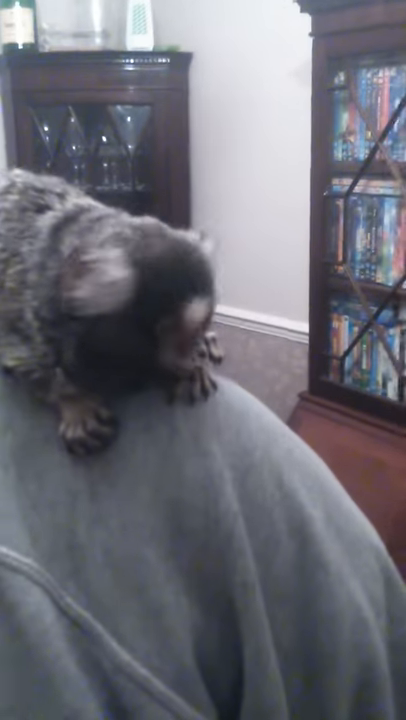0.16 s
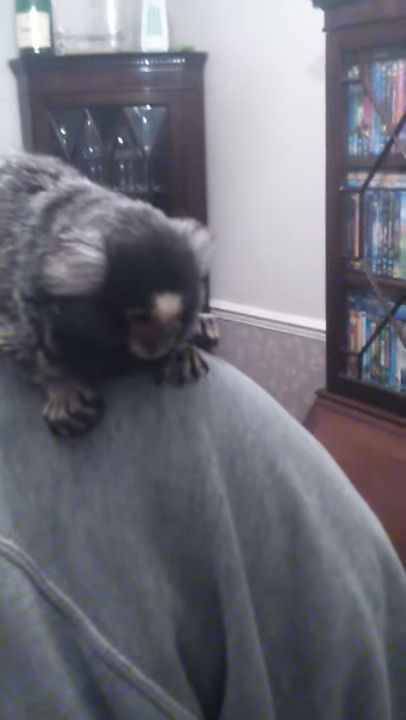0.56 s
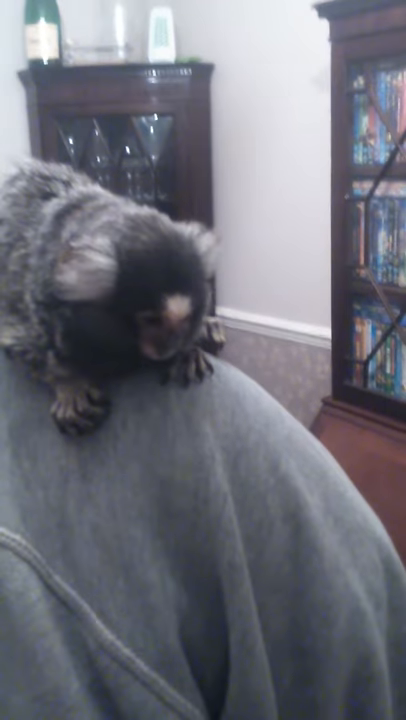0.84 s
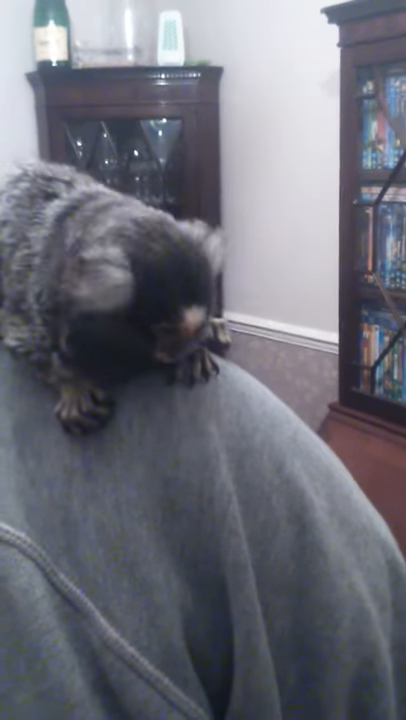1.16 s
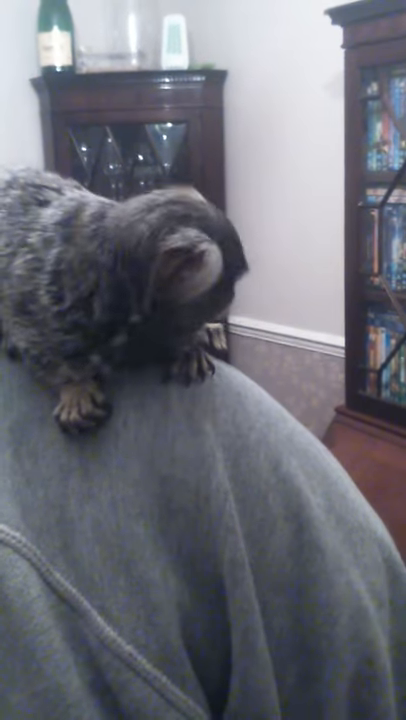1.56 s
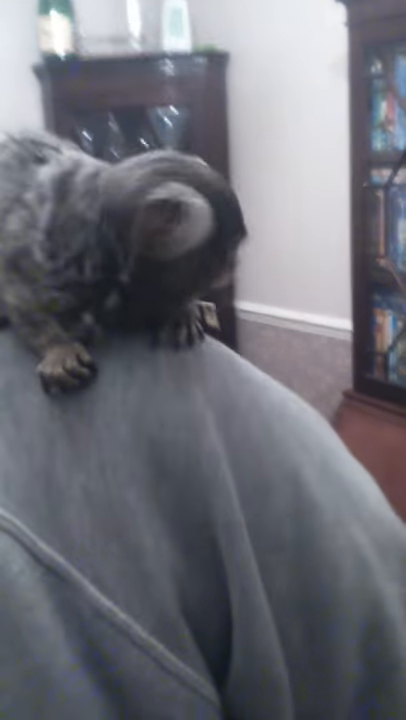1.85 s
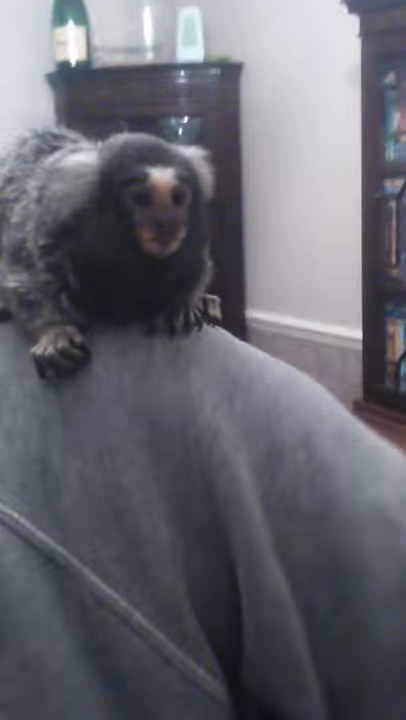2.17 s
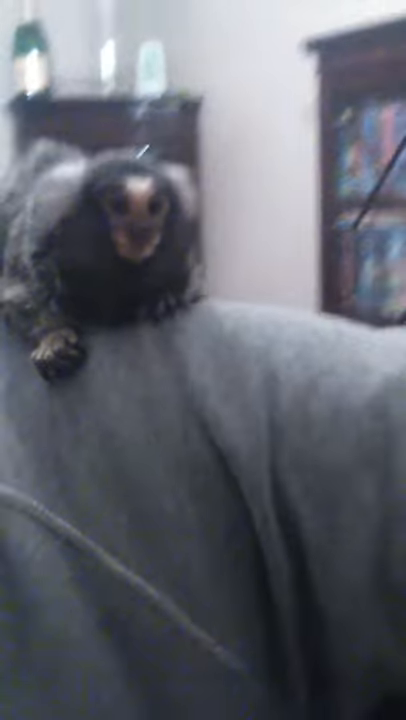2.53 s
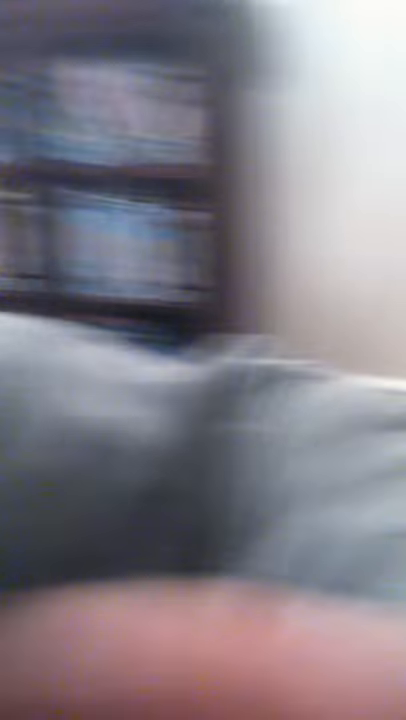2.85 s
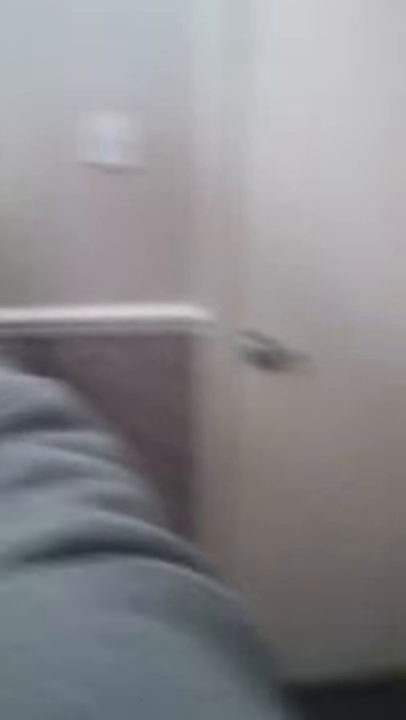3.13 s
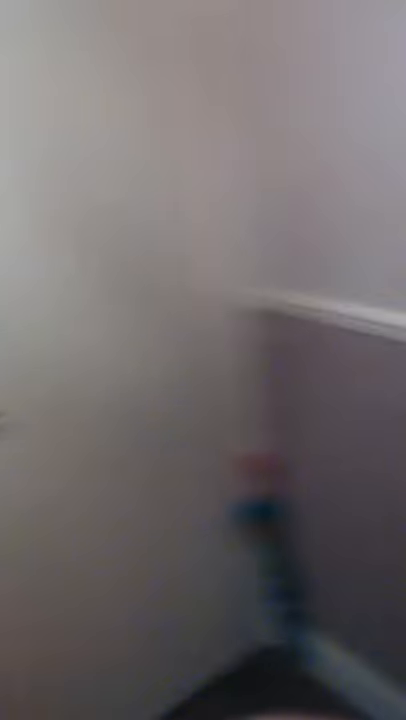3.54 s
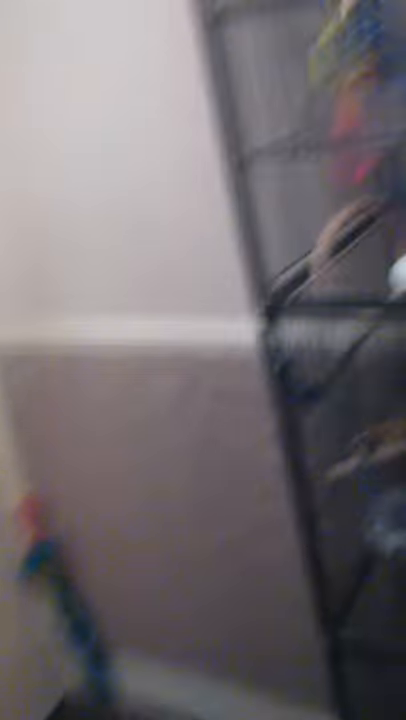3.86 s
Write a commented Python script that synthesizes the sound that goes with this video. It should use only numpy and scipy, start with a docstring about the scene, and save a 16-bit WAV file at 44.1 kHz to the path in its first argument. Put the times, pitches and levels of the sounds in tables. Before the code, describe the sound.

A small monkey chitters faintly in a quiet furnished room with low rumble, hiss and slight hum. After 1.2 s of room tone come thin gliding squeaks and dry raspy chirps, strongest around 1.2-1.5 s, then sparse until 2.6 s. Soft phone taps and ticks follow at 2.7-3.3 s. At 3.3-3.4 s a very loud, distorted, fluttering thump and scrape hits the microphone, then faint cloth rustle and a tiny tap at 3.9 s.

```python
"""A small monkey on a person's shoulder chitters in a quiet room: gliding sines squeak and random throat pulses
rasp through one strong mouth resonance, with a short room answer. The hand holding the phone then shifts: decaying
sines tap the case, single pushes tick, a low flap and grainy noise scrape loudly over the microphone, and shaped
noise rustles like soft cloth. Noise and wavering sines give room rumble, microphone hiss and mains hum under all."""
import sys
import numpy as np
from scipy import signal
from scipy.fft import rfft, irfft, next_fast_len
from scipy.io import wavfile
from scipy.ndimage import uniform_filter1d, map_coordinates

SR = 44100
rng = np.random.default_rng(int(sys.argv[2]) if len(sys.argv) > 2 else 0)


def magnitude_from_level(level_db):
    """Linear magnitude for a level in decibels (20 dB per decade)."""
    exponent = np.asarray(level_db, float) / 20
    return 10 ** exponent


def generate_wav(signal):
    """Clip the signal to [-1, 1] and save it as 16-bit WAV at the path in sys.argv[1]."""
    frames = np.transpose(np.atleast_2d(signal))
    scaled = np.clip(frames, -1, 1) * 32767
    pcm = np.round(scaled).astype(np.int16)
    wavfile.write(sys.argv[1], SR, pcm)


N = 176400
T = np.arange(N) / SR


def unit(x):
    """Normalisation: divides a signal by its root mean square."""
    return x / np.sqrt(np.mean(x ** 2) + 1e-20)


def curves(rows):
    """Linear interpolation: each column after the time as one value per sample, then an on/off gate."""
    times, *columns = np.transpose(rows)
    gate = (T >= times[0]) & (T <= times[-1])
    return [np.interp(T, times, column) for column in columns] + [gate]


def wobble(rate):
    """Slow random modulation: a smooth spline through normal random knots, rate of them a second."""
    knots = rng.standard_normal(int(N * rate / SR) + 4)
    return map_coordinates(knots, [T * rate])


def filtered(x, response):
    """Linear filtering: multiplies the spectrum by a response given as a function of frequency in Hz."""
    size = next_fast_len(N + SR // 2)
    spectrum = rfft(x, size) * response(np.fft.rfftfreq(size, 1 / SR))
    return irfft(spectrum, size)[:N]


def noise(points):
    """Spectral shaping: white noise coloured along a log-frequency curve, then brought to rms 1."""
    f, db = np.transpose(points)

    def colour(hz):
        return magnitude_from_level(np.interp(np.log(hz + 1), np.log(f + 1), db))
    return unit(filtered(rng.standard_normal(N), colour))


def peak(centre_hz, width_hz):
    """Second-order resonance: a response of unit gain at its centre, falling off to both sides."""
    return lambda f: 1j * f * width_hz / (centre_hz ** 2 - f * f + 1j * f * width_hz)


def voice(hz, gain, overtone):
    """Frequency and amplitude modulation: a wavering, shimmering sine with its octave at a given ratio."""
    waver, shimmer_db = 0.025, 4  # fraction of the pitch; dB
    phase = 2 * np.pi * np.cumsum(hz * (1 + waver * wobble(500))) / SR
    tone = np.sin(phase) + overtone * np.sin(2 * phase)
    return gain * magnitude_from_level(shimmer_db * wobble(300)) * tone * np.sqrt(2)


def mains_hum():
    """Additive synthesis: mains harmonics as sines with slowly drifting phase and level."""
    # mains harmonics: (frequency [Hz], mid rms level [dB])
    harmonics = [(200, -75.5), (300, -75.5)]
    total = np.zeros(N)
    for hz, db in harmonics:
        level = magnitude_from_level(db + 1.5 * wobble(6.14))
        total += level * np.sqrt(2) * np.sin(2 * np.pi * hz * T + 0.5 * wobble(2.2))
    return total


def room():
    """Stationary noise: hiss and rumble share one sloping spectrum, of which only the bass sways in level."""
    # spectrum of the noise floor: (frequency [Hz], relative level per Hz [dB])
    floor_tone = [(30, -5), (55, 5), (170, -12.5), (400, -18.5), (1150, -24.5), (4000, -29), (15600, -32)]
    floor_db = -57.5  # rms before the sway
    sway_db, bass_top_hz = 1.5, 130
    after_db, moved_s = -4.5, 3.4  # the bass drops once the phone points elsewhere
    floor = magnitude_from_level(floor_db) * noise(floor_tone)
    bass = filtered(floor, lambda f: 1 / (1 + (f / bass_top_hz) ** 4))
    sway = magnitude_from_level(sway_db * wobble(8.85) + after_db * (T > moved_s))
    return floor + (sway - 1) * bass + mains_hum()


def cloth():
    """Friction noise: fabric rustles as high-pitched noise under a changing level."""
    # level of the rustle: (time [s], level [dB])
    rustle_level = [(3.36, -81), (3.4, -35), (3.45, -60.5), (3.6, -71), (3.65, -61), (3.7, -66.5),
                    (3.8, -62), (3.87, -61.5), (3.91, -69.5)]
    # spectrum of the rustle: (frequency [Hz], relative level per Hz [dB])
    rustle_tone = [(2500, -24.5), (4000, -15.5), (8000, -11), (15500, -23)]
    db, gate = curves(rustle_level)
    return magnitude_from_level(db + 1.5 * wobble(60)) * gate * noise(rustle_tone)


def rubbing():
    """Friction noise: fast random level swings make the dragging hand's noise crackle."""
    # level of the rubbing: (time [s], level [dB])
    rub_level = [(3.2, -62), (3.285, -42), (3.3, -19), (3.302, -60), (3.326, -55), (3.33, -28),
                 (3.333, -55), (3.339, -26), (3.349, -29), (3.356, -52), (3.369, -23), (3.385, -16),
                 (3.4, -17), (3.408, -28), (3.427, -39), (3.432, -54), (3.46, -70)]
    # spectrum of the rubbing: (frequency [Hz], relative level per Hz [dB])
    rub_tone = [(120, -6.5), (300, -1.5), (600, -16.5), (3000, -19.5), (15500, -51)]
    grain_db = 3.3
    rub = unit(noise(rub_tone) * magnitude_from_level(grain_db * wobble(900)))
    db, gate = curves(rub_level)
    return magnitude_from_level(db) * gate * rub


def scrape():
    """Saturation: a low skin flap of changing rate and the rubbing press the membrane until it bottoms out."""
    # skin flapping over the port: (time [s], mid rate [Hz], level of the fundamental before the limit [dB])
    flapping = [(3.3075, 55.5, -19), (3.311, 52, -11), (3.319, 40, -7), (3.326, 55.08, -9),
                (3.362, 56.1, -11.5), (3.371, 112, -13), (3.398, 145.2, -16), (3.405, 121, -49),
                (3.47, 80, -57.5)]
    rate_wobble, overtone, skew_rad = 0.042, 0.21, 3.8  # the third harmonic squares the swing
    whine_hz, whine_db = 6000, -48  # dB relative to the flap
    membrane_top = 0.48  # largest swing, full scale = 1
    hz, db, gate = curves(flapping)
    phase = 2 * np.pi * np.cumsum(hz * gate * (1 + rate_wobble * wobble(80))) / SR
    swing = np.sin(phase) + overtone * np.sin(3 * phase + skew_rad)
    both = magnitude_from_level(db) * gate * np.sqrt(2) * swing + rubbing()
    limited = both / (1 + np.abs(both / membrane_top) ** 4) ** 0.25
    # a thin whine with its octave swells twice in each flap cycle
    whine = magnitude_from_level(whine_db + db) * gate * np.cos(phase) ** 2 * voice(whine_hz, 1, 0.74)
    return limited + whine


def taps():
    """Damped vibration: each soft tap on the case is a decaying sine whose pitch sinks as it dies."""
    # taps: (time [s], level at the onset [dB], starting pitch [Hz], time to fall 60 dB [s])
    case_taps = [(1.422, -34.5, 366, 0.0097), (2.703, -44, 75.5, 0.39), (2.9228, -29.5, 260, 0.02),
                 (3.031, -38.5, 90, 0.045), (3.9, -48, 501, 0.0166)]
    rise_s = 0.00023
    out = np.zeros(N)
    for start, db, hz, t60 in case_taps:
        t = np.clip(T - start, 0, 1)
        phase = 2 * np.pi * hz * t60 / 4 * np.log1p(4 * t / t60)
        out -= magnitude_from_level(db - 60 * t / t60) * np.sin(phase) * (1 - np.exp(-t / rise_s))
    return out


def ticks():
    """Impulse: each sharp finger tick is a single one-sided push, shorter and so brighter at a higher corner."""
    # ticks: (time [s], peak level [dB], frequency above which it is dull [Hz])
    finger_ticks = [(1.4209, -43, 700), (2.917, -44, 600), (2.970, -42, 1800), (2.993, -49.5, 900),
                    (3.012, -45, 1800), (3.0292, -39, 796), (3.268, -37, 6000)]
    out = np.zeros(N)
    for start, db, dull_hz in finger_ticks:
        u = np.clip(T - start, 0, 0.1) * 2 * np.pi * dull_hz
        out += magnitude_from_level(db) * (u * np.exp(1 - u)) ** 2
    return out


def snaps():
    """Exponential relaxation: skin snaps on and off the port, so the pressure jumps and sinks back."""
    # snaps: (time [s], signed pressure step before the rise softens it [full scale = 1], decay constant [s])
    skin_snaps = [(3.3063, -0.73, 0.0017), (3.316, 0.37, .001), (3.3197, -0.24, .0003),
                  (3.3231, .08, .0004), (3.3967, -2, 0.000074)]
    rise_s = 0.00012
    out = np.zeros(N)
    for start, step, life in skin_snaps:
        t = np.clip(T - start, 0, 1)
        out += step * np.exp(-t / life) * (1 - np.exp(-t / rise_s))
    return out


def squeaks():
    """Frequency glide: one long whistle with an octave, and short pure squeaks, before the mouth shapes them."""
    # the long whistle: (time [s], mid pitch [Hz], mid level before the mouth [dB])
    whistle_glide = [(1.228, 3500, -70), (1.233, 3250, -63), (1.242, 2685, -60), (1.245, 3000, -78),
                     (1.251, 3356, -65), (1.271, 2550, -60), (1.29, 3150, -64), (1.297, 2500, -59),
                     (1.304, 1900, -63), (1.308, 1800, -77.5)]
    # short squeaks: (time [s], length [s], mid level before the mouth [dB], start pitch [Hz], end pitch [Hz])
    short_squeaks = [(1.219, 0.011, -49.5, 5020, 3776), (1.295, 0.0084, -57, 5100, 4213),
                     (1.298, 0.0167, -48, 4140, 4054), (1.322, 0.018, -55.5, 4240, 4060),
                     (1.454, .022, -72, 7030, 6600), (1.4732, 0.021, -61.5, 5520, 5100),
                     (1.494, 0.0087, -53.5, 5100, 4350), (1.632, 0.0096, -61, 5034, 4500),
                     (2.036, 0.007, -60.5, 2400, 3070), (2.043, 0.0046, -62, 4080, 4600),
                     (2.093, 0.0069, -61, 4900, 4160), (2.111, 0.012, -58.5, 4136, 4238),
                     (2.2152, 0.0051, -56, 3985, 4820), (2.407, 0.0087, -56, 4809, 4300)]
    octave_db = -12
    hz, db, gate = curves(whistle_glide)
    tones = voice(hz, magnitude_from_level(db) * gate, magnitude_from_level(octave_db))
    for start, length, db, start_hz, end_hz in short_squeaks:
        u = np.clip((T - start) / length, 0, 1)  # progress through the squeak
        swell = np.abs(np.sin(np.pi * u ** 0.68)) ** 0.37 * (u < 1)
        tones = tones + voice(start_hz + (end_hz - start_hz) * u, magnitude_from_level(db) * swell, 0)
    return tones


def pulses():
    """Random excitation: irregular clumped throat pulses, evened out by their running power."""
    pulses_per_s, spread_db = 5000, 4
    hits = rng.random(N) < pulses_per_s / SR
    p = hits * rng.standard_normal(N) * magnitude_from_level(spread_db * wobble(250))
    return p / np.sqrt(np.abs(uniform_filter1d(p ** 2, size=800)) + 1e-6)


def pulse_band(envelope, response):
    """Source and filter: throat pulses under an envelope excite a resonance, scaled to its steady rms."""
    p = pulses()
    return filtered(p * envelope, response) / np.std(filtered(p, response))


def rasps(mouth):
    """Source and filter: bursts of throat pulses sound in a mouth band and a lower throat band."""
    # raspy bursts: (time [s], length [s], mouth band level [dB], throat band relative to it [dB])
    bursts = [(1.214, 0.068, -65, -1.5), (1.303, 0.0117, -53, 2.5), (1.317, 0.0202, -58.5, 1.5),
              (1.417, 0.0143, -54.5, -6), (1.474, 0.024, -55, -13), (1.497, 0.0251, -45.5, -12),
              (1.612, 0.009, -54, -12), (1.71, 0.0069, -62.5, -16), (1.719, 0.018, -56, -2.5),
              (1.832, 0.0047, -65, 3), (1.84, .013, -51, -13), (1.936, 0.018, -52, -5.5),
              (2.1, 0.0342, -56.5, -6.5), (2.216, 0.0116, -56, -16.5), (2.333, 0.056, -59, -7.5),
              (2.411, 0.0396, -64.5, -10), (2.557, 0.0169, -61.5, -6.5)]
    edge_s = 0.002
    throat = peak(2300, 1500)  # centre, width [Hz]
    high, low = np.zeros(N), np.zeros(N)
    for start, length, db, low_db in bursts:
        shape = np.clip(np.minimum(T - start, start + length - T) / edge_s + 0.5, 0, 1)
        high += magnitude_from_level(db) * shape
        low += magnitude_from_level(db + low_db) * shape
    return pulse_band(high, lambda f: mouth(f) ** 3) + pulse_band(low, lambda f: throat(f) ** 2)


def monkey():
    """Resonance and reverberation: the mouth lifts squeaks and rasps near its peak, and the room answers."""
    mouth = peak(4430, 840)  # centre, width [Hz]
    mouth_db = 6  # resonant path relative to the direct tone
    echo_t60_s, echo_db, echo_delay_s = 0.17, -9.5, 0.004
    call = filtered(squeaks(), lambda f: 1 + magnitude_from_level(mouth_db) * mouth(f)) + rasps(mouth)
    t = T[:SR // 4]
    tail = rng.standard_normal(len(t)) * magnitude_from_level(-60 * t / echo_t60_s) * (t > echo_delay_s)
    tail = tail / np.linalg.norm(tail)
    echo = signal.fftconvolve(filtered(call, mouth), tail)[:N]
    return call + magnitude_from_level(echo_db) * echo


def scene():
    """Superposition: the pressures of all sources add, in mono."""
    handling = scrape() + taps() + ticks() + snaps()
    return (room() + cloth() + handling + monkey())[None]


def low_pass(x):
    """Removes everything above the highest recorded frequency."""
    return signal.sosfilt(signal.butter(12, 15760, fs=SR, output="sos"), x)


def record(dry):
    """High-pass filtering: three equal first-order stages form the phone's low cut."""
    low_cut_hz = 30  # corner of each stage
    cut = filtered(dry[0], lambda f: (1j * f / (low_cut_hz + 1j * f)) ** 3)
    return low_pass(cut[None])


dry = scene()
out = record(dry)
generate_wav(out)
```